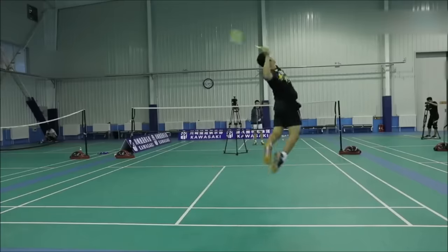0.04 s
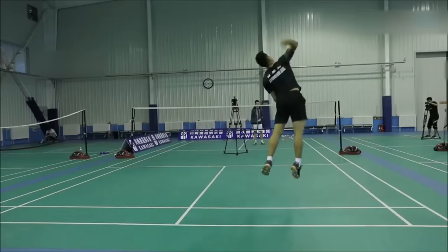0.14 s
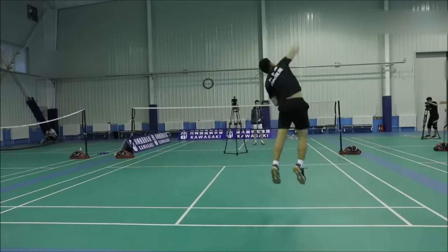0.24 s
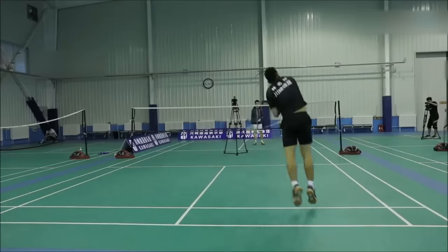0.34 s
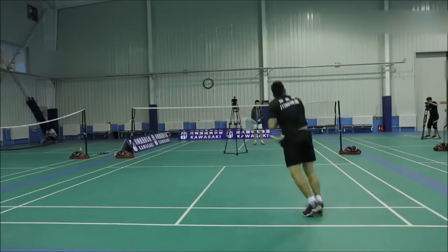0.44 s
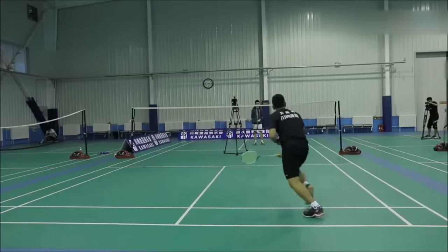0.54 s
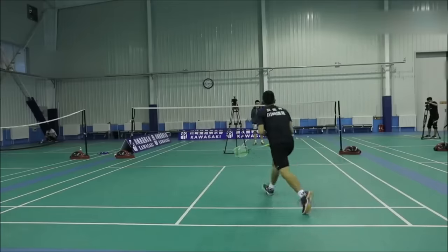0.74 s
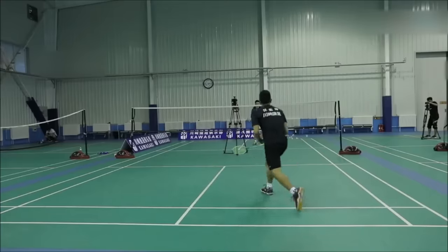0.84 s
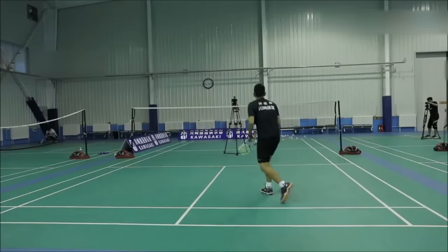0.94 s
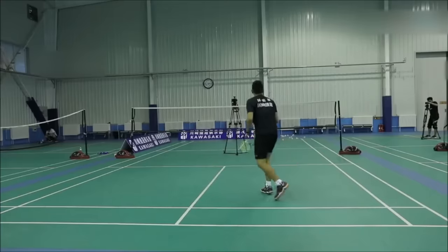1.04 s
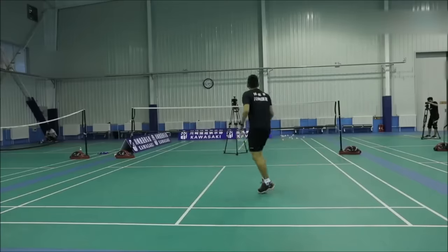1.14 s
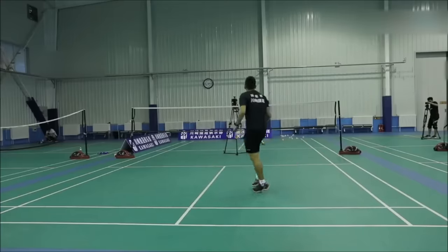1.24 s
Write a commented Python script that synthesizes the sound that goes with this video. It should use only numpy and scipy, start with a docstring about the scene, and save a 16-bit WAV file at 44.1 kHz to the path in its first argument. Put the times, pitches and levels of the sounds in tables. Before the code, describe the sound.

A badminton racket swishes briefly and strikes a shuttlecock with one sharp crack at about 0.2 seconds, echoing through a large hall until the end. Before it, only the faint tail of a shoe squeak hangs over a low room rumble. The player lands with a soft thud at 0.4 seconds, takes quieter steps around 0.8, and a sole brushes the floor very faintly near one second.

```python
"""A badminton jump smash: racket strings crack against the shuttlecock in a large, hard-walled hall.
The racket swishes in, the cork clicks, the string bed gives and snaps back, and the feathers crackle.
Floor, walls and roof throw the crack back into a long reverberation where the string notes linger.
A shoe squeak from the take-off still hangs in the air; the player lands on the sprung floor
and steps off over a faint low rumble."""
import sys
import numpy as np
from scipy import signal
from scipy.fft import rfft, irfft
from scipy.io import wavfile

SR = 44100
rng = np.random.default_rng(int(sys.argv[2]) if len(sys.argv) > 2 else 0)


def dump(signal):
    """Clip the signal to [-1, 1] and save it as 16-bit WAV at the path in sys.argv[1]."""
    limited = np.clip(np.atleast_2d(signal).T, -1, 1)
    pcm = np.round(limited * 32767).astype(np.int16)
    wavfile.write(sys.argv[1], SR, pcm)


N = 57330
T = np.arange(N) / SR
FREQS = np.maximum(np.arange(N // 2 + 1) * SR / N, 1)
HIT_S, FIRST_ECHO_S = .232, .261
BOUNCE_DELAY_S = .00335   # the floor answers this long after the hit


def from_db(db):
    """Decibels to gain."""
    return 10 ** (np.asarray(db) / 20)


def at_hz(points, hz):
    """Read a table on a log-frequency axis."""
    table_hz, value = np.transpose(points)
    return np.interp(np.log(hz), np.log(table_hz), value)


def unit_rms(x):
    """Scale to unit power."""
    return x / np.sqrt(np.mean(x ** 2) + 1e-20)


def decay(start_s, t60_s):
    """Silence, then an exponential fall from one."""
    return (T >= start_s) * np.exp(-np.log(1000) * np.maximum(T - start_s, 0) / t60_s)


def filtered(x, hz, kind="low", order=1):
    """Gentle low- or high-pass."""
    return signal.sosfilt(signal.butter(order, hz, kind, fs=SR, output="sos"), x + 1e-18)


def shaped_noise(gain):
    """Unit noise with the given gain at each frequency."""
    return unit_rms(irfft(gain * np.exp(2j * np.pi * rng.random(len(FREQS))), N))


def noise(eq):
    """Unit noise coloured by an EQ table."""
    return shaped_noise(from_db(at_hz(eq, FREQS)))


def delayed(x, delay_s):
    """The same sound, later."""
    return np.concatenate([np.zeros(int(delay_s * SR)), x])[:N]


# Colour of the room tone: freq_hz, gain_db
ROOM_EQ = [(20, -15.5), (45, -21.5), (70, 0.5), (150, 4.5), (330, 2), (500, -10.5), (700, -7.5),
           (1200, -2.5), (2000, -16.5), (3200, -40.5), (6000, -28.5), (10000, -33), (13000, -40)]

def room_tone():
    """A faint, steady bed of low rumble."""
    return from_db(-59.5) * noise(ROOM_EQ)


# Colour of the squeak's tail: freq_hz, gain_db
SQUEAK_EQ = [(1400, -50.5), (1750, -12.5), (2000, -1.5), (2350, -1.5), (2650, -18.5), (3100, -33.5),
             (3800, -24), (4300, -21), (4720, -10), (5100, -40.5), (6000, -53.5)]

def squeak_tail():
    """The shoe squeak of the take-off fades in the hall."""
    return from_db(-50.5) * decay(0, t60_s=4.7) * noise(SQUEAK_EQ)


# Colour of the scuff: freq_hz, gain_db
SCUFF_EQ = [(2000, -20), (5000, -5), (10500, 6.5), (13000, -2)]

def scuff(peak_s=1.053, width_s=.11):
    """A sole brushes the mat in a soft swell of hiss."""
    return from_db(-73) * np.exp(-((T - peak_s) / width_s) ** 2) * noise(SCUFF_EQ)


# Colour of a sole's slap: freq_hz, gain_db
SOLE_EQ = [(40, -30.5), (80, -14), (220, 11), (320, -7), (700, -34), (3000, -45), (12000, -62)]
# Colour of its boom in the hall: freq_hz, gain_db
BOOM_EQ = [(35, -31), (60, -7), (90, -6), (140, 6.5), (250, -7), (600, -54)]
# Footfall cues: start_s, level_db, floor_pitch_hz, slap_mix_db
FOOTFALLS = [(0.403, -36, 174, -9), (.455, -51, 99, 0), (.785, -40, 100, 3), (.825, -44, 150, -0.5),
             (.87, -52, 95, 1)]

def footfalls(attack_s=.016, thud_t60_s=.17):
    """Each step sounds a low note in the sprung floor, and its slap booms out in the hall."""
    out = np.zeros(N)
    for start_s, level_db, pitch_hz, slap_mix_db in FOOTFALLS:
        attack = np.clip((T - start_s) / attack_s, 0, 1)
        thud = decay(start_s, thud_t60_s)
        note = thud * np.sin(2 * np.pi * pitch_hz * (T - start_s))
        slap = thud * noise(SOLE_EQ)
        boom = from_db(-7) * decay(start_s, t60_s=.92) * noise(BOOM_EQ)
        out += from_db(level_db) * attack * (note + from_db(slap_mix_db) * (slap + boom))
    return out


# Colour of the reverb: freq_hz, gain_db
REVERB_EQ = [(30, -54.5), (70, -34), (110, -25.5), (160, -9.5), (300, -7), (680, -7.5), (900, -3),
             (1400, -1.5), (1600, -8.5), (2300, -8.5), (3100, -10.5), (4000, -14.5), (5400, -19.5),
             (7500, -15), (10000, -18.5), (11800, -20.5), (13000, -30.5)]
# Reverb time: freq_hz, t60_s
REVERB_TIMES = [(100, 5.5), (300, 4.24), (600, 4), (1000, 6), (1420, 4.9), (1650, 4.16), (2300, 5.2),
                (3200, 3.3), (5000, 2.31), (7500, 1.22), (10000, 0.95), (13000, 0.57)]
# String notes that linger in the hall: pitch_hz, half_width_hz, level_db
LINGERING_NOTES = [(1186, 17, -47), (1372, 7, -49.5), (1427.5, 24, -44), (1774, 35, -55.5)]

def hall_reverb(build_s=.066, linger_t60_s=6.6):
    """Dense reflections build up and die band by band; the string notes linger longest."""
    wash = rfft(noise(REVERB_EQ))
    bands_hz = np.geomspace(80, 13000, num=30)
    tail = np.zeros(N)
    for hz, selector in zip(bands_hz, np.eye(len(bands_hz))):
        band_gain = np.interp(np.log(FREQS), np.log(bands_hz), selector)
        tail += irfft(wash * band_gain, N) * decay(FIRST_ECHO_S, at_hz(REVERB_TIMES, hz))
    flicker = unit_rms(filtered(rng.standard_normal(N), hz=130, order=2))
    grain = from_db(1.35 * flicker * decay(FIRST_ECHO_S, t60_s=6.6))
    notes = sum(from_db(level_db) * shaped_noise(1 / (1 + ((FREQS - pitch_hz) / half_width_hz) ** 2))
                for pitch_hz, half_width_hz, level_db in LINGERING_NOTES)
    build = from_db(-11.5 * np.clip(1 - (T - FIRST_ECHO_S) / build_s, 0, 1))
    early_boost = np.hypot(1, from_db(7) * decay(FIRST_ECHO_S, t60_s=1))
    return build * early_boost * (from_db(-31.5) * tail * grain + notes * decay(FIRST_ECHO_S, linger_t60_s))


# Echo taps from walls and roof: arrival_s, level_db, lowpass_hz, ring_mix_db
ECHO_TAPS = [(0.2616, -10.5, 5500, -22), (.2685, -17, 4500, -18), (0.2856, -33, 3500, -14),
             (0.2964, -18.5, 6000, -14), (.3008, -25, 3060, 0), (0.3209, -20, 1840, -1),
             (0.3268, -22, 1730, 0), (0.341, -17, 2500, -3), (0.348, -19, 3880, -7)]

def wall_echoes(crack, string_hz=1218):
    """Ribbed walls and roof return the crack, smeared and tinged by the note the racket face sends them."""
    out = np.zeros(N)
    note = decay(0, t60_s=.02) * np.sin(2 * np.pi * string_hz * T)
    ring = np.std(crack) * unit_rms(signal.fftconvolve(crack, note)[:N])
    for arrival_s, level_db, lowpass_hz, ring_mix_db in ECHO_TAPS:
        scatter = rng.standard_normal(N) * decay(0, t60_s=.016)
        smear = signal.fftconvolve(crack, scatter / np.linalg.norm(scatter))[:N]
        echo = filtered(crack + from_db(-7) * smear, lowpass_hz) + from_db(ring_mix_db) * ring
        out += from_db(level_db) * delayed(echo, arrival_s - HIT_S)
    return out


# Colour of the close reflections: freq_hz, gain_db
SCATTER_EQ = [(30, -31.5), (100, -20.5), (250, 3), (600, -6.5), (1300, 4), (2500, -3.5), (5500, -15.5),
              (8000, -9.5), (13000, -17)]

def near_scatter():
    """Player, net and posts scatter the crack before the first wall answers."""
    return from_db(-36.5) * decay(HIT_S + BOUNCE_DELAY_S, t60_s=.31) * noise(SCATTER_EQ)


def floor_bounce(crack, treble_gain=.63):
    """The court floor returns the crack a little duller."""
    dull = filtered(crack, hz=2514)
    return from_db(-2) * delayed(dull + treble_gain * (crack - dull), BOUNCE_DELAY_S)


# Colour of the air through the strings: freq_hz, gain_db
SWISH_EQ = [(100, -27), (350, -8), (600, -5.5), (1400, 3), (2800, -9.5), (5000, -13), (10000, -4.5),
            (13000, -16.5)]

def swish(start_s=.191, attack_s=.026, release_s=.019):
    """Air rushes through the strings, and the shaft's whistle rises with the racket's speed."""
    swing = np.clip((T - start_s) / attack_s, 0, 1) * np.exp(-np.maximum(T - HIT_S, 0) / release_s)
    pitch_hz = np.interp(T, [start_s, HIT_S], [380, 1308])
    flutter = filtered(rng.standard_normal(N), hz=120, order=2)
    whistle = unit_rms(flutter * np.sin(2 * np.pi * np.cumsum(pitch_hz) / SR))
    return swing * (from_db(-45.5) * noise(SWISH_EQ) + from_db(-46.5) * whistle)


# Colour of the feather skirt: freq_hz, gain_db
FEATHER_EQ = [(1500, -8), (2500, 3.5), (3900, -3), (5400, -4.5), (7000, 1.5), (10500, -0.5), (12000, -3),
              (13500, -24)]
# Ring of racket and shuttle: pitch_hz, level_db, t60_s, delay_s
RING_MODES = [(1244, -21.5, 0.012, 0.0024), (1840, -25.5, .012, 0), (2910, -32, .010, 0.009),
              (4024, -13, .004, 0), (6590, -33, .010, 0.0057), (10290, -9.5, 0.0044, 0.0014)]

def smash(click_width_s=.00004, contact_s=.001555, rebound_s=.00028):
    """The cork clicks, the string bed gives and snaps back, feathers crackle, racket and shuttle ring."""
    age = T - HIT_S
    click = from_db(-1) * np.exp(-(age / click_width_s) ** 2)
    push = -from_db(-14) * np.sin(np.pi * np.clip(age / contact_s, 0, 1) ** 2)
    rebound = from_db(-10.5) * np.sin(np.pi * np.clip((age - contact_s) / rebound_s, 0, 1))
    contact = (age >= 0) * (age < contact_s) + decay(HIT_S + contact_s, t60_s=.002)
    flutter = decay(HIT_S, t60_s=.053)   # the shuttle rustles as it leaves
    crackle = np.hypot(from_db(-14.5) * contact, from_db(-28.5) * flutter)
    feathers = crackle * filtered(noise(FEATHER_EQ), hz=1000, kind="high")
    ring = np.zeros(N)
    for pitch_hz, level_db, t60_s, delay_s in RING_MODES:
        tone = np.sin(2 * np.pi * pitch_hz * (age - delay_s))
        ring += from_db(level_db) * decay(HIT_S + delay_s, t60_s) * tone
    return filtered(click + push + rebound + feathers + ring, hz=140, kind="high")


def scene():
    """Mono mix of the stroke, its reflections, the player's feet and the room tone."""
    crack = smash()
    reflections = floor_bounce(crack) + near_scatter() + wall_echoes(crack) + hall_reverb()
    stroke = swish() + crack
    feet = squeak_tail() + footfalls() + scuff()
    return (stroke + reflections + feet + room_tone())[None]


def record(dry):
    """A steep low-pass cuts the top end."""
    cutoff_hz = 13000
    return signal.sosfilt(signal.ellip(8, .3, 80, cutoff_hz, fs=SR, output="sos"), dry)


dry = scene()
out = record(dry)
dump(out)
```